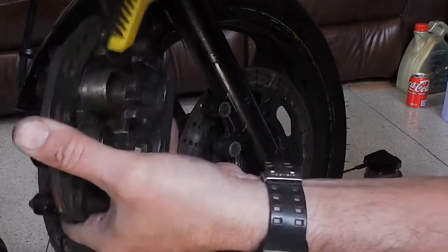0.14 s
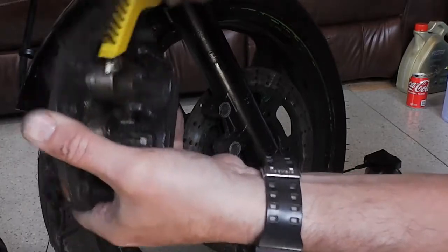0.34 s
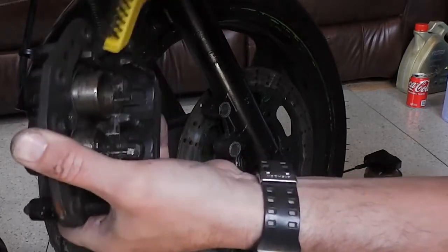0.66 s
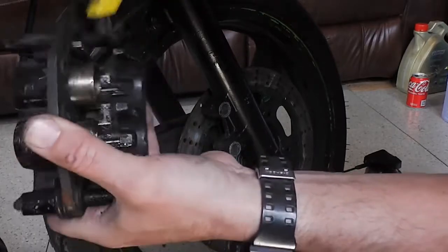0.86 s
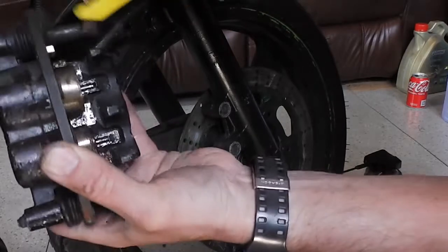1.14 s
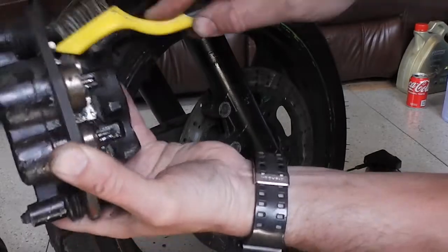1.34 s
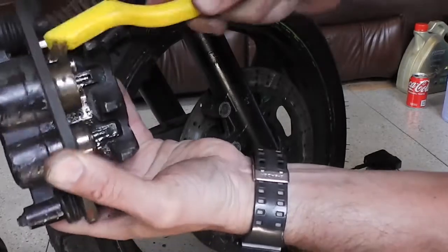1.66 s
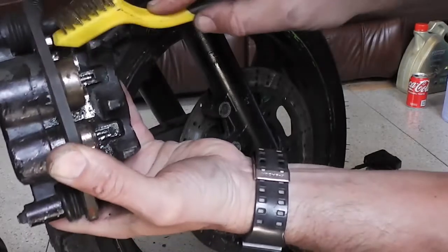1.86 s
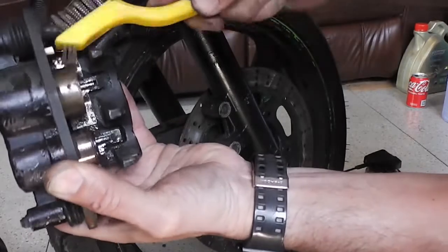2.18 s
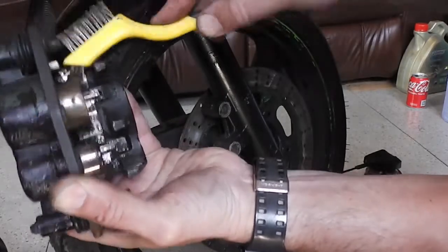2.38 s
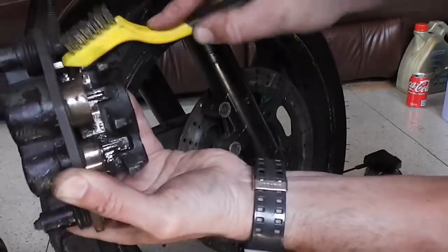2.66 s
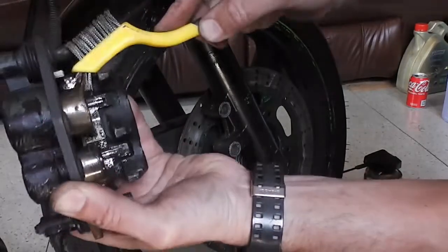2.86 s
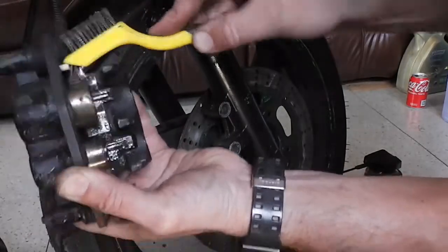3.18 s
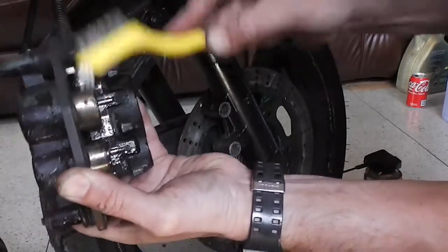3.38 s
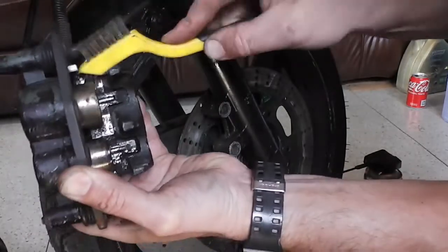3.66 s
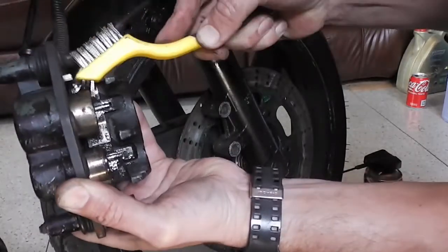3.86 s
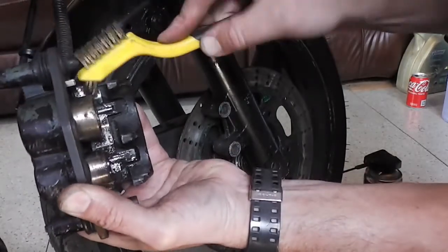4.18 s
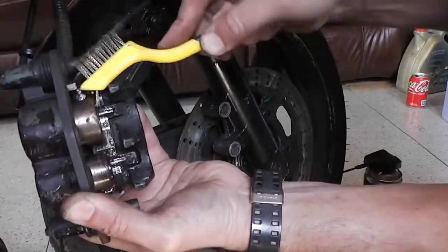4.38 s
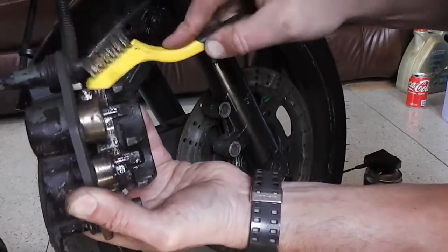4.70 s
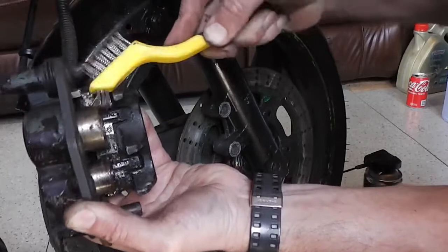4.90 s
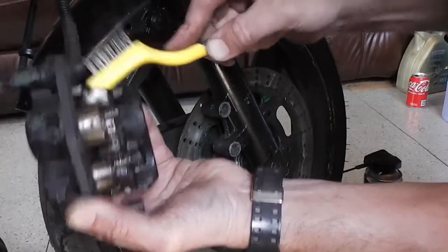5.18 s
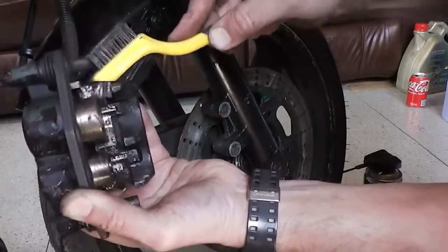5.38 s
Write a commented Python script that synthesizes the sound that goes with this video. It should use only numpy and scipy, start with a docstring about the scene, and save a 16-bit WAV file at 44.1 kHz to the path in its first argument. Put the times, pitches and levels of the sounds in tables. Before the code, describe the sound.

A wire brush works over a hand-held brake caliper. The rasp is high, dry and gritty, each stroke under a tenth of a second, at uneven strength. Snagging bristles give sharp ticks; the brush head raps the casting with short, mid-pitched clacks that barely ring. One early pause holds only soft hand rustle. Quiet room hum lies beneath; the pickup is close, with a small, faint room tail.

```python
"""A small wire brush scrubs the steel pistons of a hand-held brake caliper, close by in a quiet room.
Bristles slip off the metal in clumps: noisy click trains ring the damped modes of four parts.
Tufts snag and let go with scratchy ticks; the brush head knocks the casting, as modal blows.
Shaped noise gives the room hum, a far rumble, the rub of the holding hand, grip hiss and squeaks."""
import sys
import numpy as np
from scipy import signal
from scipy.fft import rfft, irfft, next_fast_len
from scipy.io import wavfile
from scipy.ndimage import uniform_filter1d

SR = 44100
rng = np.random.default_rng(int(sys.argv[2]) if len(sys.argv) > 2 else 0)


def volts_from_db(level):
    """Convert decibel levels to linear amplitude ratios."""
    exponent = np.asarray(level, float) / 20
    return 10 ** exponent


def master_out(mix):
    """Clip the mix to full scale and print it as 16-bit PCM to the path in sys.argv[1]."""
    frames = np.transpose(np.atleast_2d(mix))
    ceiling = np.clip(frames, -1, 1)
    pcm = np.round(ceiling * 32767).astype(np.int16)
    wavfile.write(sys.argv[1], SR, pcm)


N = 244314

# modes of lower casting, upper casting, piston rim, bristle tips:
# (frequency [Hz], relative level [dB], t60 when free [s])
PART_MODES = [
    [(340, 3, 0.063), (453, -44, 0.01), (806, 3, 0.037), (906, 8, 0.091), (1250, 13, 0.014),
     (1490, 6.5, 0.017), (1616, -3, 0.051), (1880, 4.5, 0.0094), (2089, 8, 0.063), (2266, 10, 0.031)],
    [(3283, -1, 0.11), (3218, 8.5, 0.0091), (3670, 2.5, 0.027), (3816, -1.5, 0.03), (3950, 4, 0.079),
     (4473, 1, 0.029), (4873, 0.5, 0.039), (5250, 3.5, 0.037), (5000, -10, 0.038), (7200, -38, 0.032)],
    [(7600, 9, 0.013), (7980, 5, 0.037), (8050, 9, 0.024), (10320, 4, 0.015), (9110, 17, 0.039),
     (9302, 21.5, 0.032), (9680, 7, 0.017), (9950, 8.5, 0.03), (10320, -18, 0.013), (10200, -18, 0.0089)],
    [(11500, -5, 0.017), (13800, 5, 0.01), (14500, 36, 0.024)],
]
# dry scrape of each part, too damped to ring:
# (low edge [Hz], high edge [Hz], level re modes when brushed [dB], when knocked [dB])
PART_SCRAPE = [(1004, 1997, -5, -0.5), (2990, 7800, -2.5, -1.5), (7670, 10240, -3, -3.5),
               (10020, 13160, 22, 4.5)]


def evened(x):
    """Scales to rms 1."""
    return x / np.sqrt(np.mean(x ** 2) + 1e-20)


def read(points, hz):
    """Reads a table on a log-frequency axis."""
    f, value = np.transpose(points)
    return np.interp(np.log(hz + 1), np.log(f + 1), value)


def band(x, lo_hz, hi_hz):
    """Band-pass."""
    sos = signal.butter(3, [lo_hz, min(hi_hz, .45 * SR)], "bandpass", fs=SR, output="sos")
    return signal.sosfilt(sos, x)


def add(mix, s, sound):
    """Mixes a sound in at time s."""
    part = mix[round(s * SR):][:len(sound)]
    part += sound[:len(part)]


def ring(modes, spread_db, favoured_hz=None, longest_s=1):
    """Decaying sines: one part's answer to a blow; each spot struck favours other modes."""
    t = np.arange(3000) / SR
    chance = rng.standard_normal((len(modes), 2))
    tone = np.zeros(len(t))
    for (hz, db, t60_s), (level_chance, pitch_chance) in zip(modes, chance):
        off_db = -32 * np.log2(hz / favoured_hz) ** 2 if favoured_hz else 0
        envelope = volts_from_db(db + off_db + spread_db * level_chance - 60 * t / min(t60_s, longest_s))
        tone += envelope * np.sin(2 * np.pi * hz * (1 + 0.0093 * pitch_chance) * t)
    return tone / np.linalg.norm(tone)


def blow(part, favoured_hz, crack_s, by_peak):
    """Faint first touch, noise crack, then modes near the favoured pitch, damped by the hand.
    Loose pads and clips add a blur of modes too dense to tell apart."""
    snap_t60_s, blur_t60_s, held_t60_s = .004, 0.1, .022
    t = np.arange(3000) / SR
    lo_hz, hi_hz, _, dry_db = PART_SCRAPE[part]
    if favoured_hz:
        lo_hz = max(0.597 * favoured_hz, min(lo_hz, 0.63 * favoured_hz))
        hi_hz = min(1.89 * favoured_hz, 1.04 * hi_hz)
    snap = volts_from_db(3.0 - 60 * t / snap_t60_s)
    blur = volts_from_db(-8.5 - 60 * t / blur_t60_s)
    fall = snap + volts_from_db(-60 * t / crack_s) + blur
    crack = band(rng.standard_normal(len(t)) * fall, lo_hz, hi_hz)
    crack = crack / np.linalg.norm(crack)
    # fast first fall, then a quarter rings on
    tone = ring(PART_MODES[part], 2.5, favoured_hz) * (.25 + volts_from_db(-60 * t / held_t60_s))
    x = tone / np.linalg.norm(tone) + volts_from_db(dry_db) * crack
    # first touch: 40 samples of reversed crack; main onset 0.2 ms
    first_touch = volts_from_db(-24) * crack[40:0:-1]
    x = np.r_[first_touch, x[:-40] * np.minimum(t[:-40] / .0002, 1)]
    return x / (abs(x).max() if by_peak else np.sqrt(np.mean(x[:300] ** 2)))


def background():
    """Room hum, a far rumble that swells, and the dull rub of the hand: shaped stereo noise."""
    # hum spectrum, relative: (frequency [Hz], density [dB per Hz])
    hum_spectrum = [(12, -36.5), (20, 7.5), (160, 3), (189, -16), (305, -9), (342, -15), (372, -8),
                    (1080, -0.5), (2310, -16.5), (5520, -18.5), (7950, -19), (15200, -21.5), (16500, -65)]
    # left-right likeness of the noise: (frequency [Hz], correlation [-1..1])
    hum_likeness = [(60, 0.9), (180, 0.69), (550, 0.5), (1650, 0.16), (4970, 0.051), (15000, 0.1)]
    # low swells: (time [s], far rumble rms [dB], hand rubbing the casting rms [dB])
    swell_rows = [(0.0, -70, -68), (0.29, -69, -65), (0.86, -68, -65), (1.29, -68, -61.5), (1.53, -74, -50),
                  (2.27, -73, -61.5), (2.71, -77, -58.5), (3.75, -74, -57), (3.93, -53, -59.5),
                  (4.1, -47, -55), (4.32, -58, -52), (4.61, -56, -59.5), (5.11, -61, -61.5),
                  (5.54, -60, -60)]
    hum_rms_db = -54.5
    frames, hz = N // 512 + 5, np.fft.rfftfreq(2048, 1 / SR)
    a, b, c, d = rng.standard_normal((frames, 1025, 4)).T
    same = np.clip(read(hum_likeness, hz), -1, 1)[:, None]
    left = a + 1j * b
    right = same * left + np.sqrt(1 - same ** 2) * (c + 1j * d)
    z = np.array([left, right]) * volts_from_db(np.array([1., -1.]))[:, None, None]  # left 2 dB over right

    def shaped(gain):
        """Noise of rms 1 with this spectrum."""
        return evened(signal.istft(z * gain[:, None], nperseg=2048, noverlap=1536)[1][:, :N])

    s, rumble_db, rub_db = np.transpose(swell_rows)
    t = np.arange(N) / SR
    rumble = volts_from_db(np.interp(t, s, rumble_db)) * shaped(np.exp(-((hz - 51) / 8) ** 2))
    rub = volts_from_db(np.interp(t, s, rub_db)) * shaped(np.exp(-((hz - 340) / 170) ** 2))
    return volts_from_db(hum_rms_db) * shaped(volts_from_db(read(hum_spectrum, hz))) + rumble + rub


def slips():
    """Click train: bristle tips let go in clumps a few ms long; a few catch hard."""
    slips_per_s = 6000
    clumps = volts_from_db(4.27 * evened(uniform_filter1d(rng.standard_normal(N), 110)))
    size = volts_from_db(3.8 * np.minimum(rng.exponential(1, N), 4)) * rng.choice([-1, 1], N)
    return evened(size * clumps * (rng.random(N) < slips_per_s / SR))


def brush():
    """Slips under each stroke excite all parts; every stroke lands on another spot.
    The second row is the same strokes as radiated by other bristles."""
    # (start [s], length [s], piston rim as it lands [dB], as it lifts [dB],
    #  upper casting re rim at mid-stroke [dB])
    stroke_rows = [(0.067, 0.1, -47.5, -41.5, -1.5), (0.344, .11, -45, -38.5, -4.5),
                   (0.633, 0.043, -49, -32, -4.5), (1.317, 0.031, -71, -69, 16),
                   (1.379, 0.015, -46, -40, -0.5), (1.498, 0.032, -63, -44, -1.5),
                   (1.546, 0.071, -52, -47, -5), (1.624, 0.066, -37, -38.5, -2.5),
                   (1.424, .075, -65, -66, 1.5), (1.72, 0.085, -67, -65, 1), (1.848, 0.034, -45, -53, -5.5),
                   (1.89, 0.062, -48, -51.5, 2.5), (1.958, 0.073, -53, -56, -2),
                   (2.014, 0.012, -47, -41.5, 0), (2.038, .045, -57, -55, -2),
                   (2.102, 0.064, -41, -47.5, -1.5), (2.174, 0.074, -38, -37, -9.5),
                   (2.285, 0.056, -39.5, -41, -11), (2.358, .04, -70, -68, 5),
                   (2.415, 0.021, -34, -44.5, -3.5), (2.444, 0.038, -49, -48, -3),
                   (2.502, 0.08, -47, -42, -5), (2.613, 0.079, -46.5, -44, -8), (2.717, 0.058, -57, -53, 6),
                   (2.794, 0.018, -40, -42.5, 0), (2.831, 0.051, -40.5, -55, -1),
                   (2.883, 0.073, -52, -59.5, -6), (2.96, 0.053, -41.5, -35.5, -7.5),
                   (3.036, 0.076, -43, -37.5, -6), (3.133, 0.063, -63, -47.5, 1),
                   (3.188, 0.04, -38.5, -34, -12), (3.237, 0.018, -52, -58, 0),
                   (3.262, 0.059, -49.5, -35.5, -4), (3.662, 0.055, -49, -43, 4.5),
                   (3.737, 0.084, -53, -53.5, -2), (3.842, 0.046, -46.5, -44.5, -1),
                   (3.947, 0.036, -68, -59, 2.5), (3.987, 0.084, -41.5, -37.5, -3),
                   (4.1, 0.069, -61, -66, 2.5), (4.175, 0.051, -47, -42.5, -9.5),
                   (4.264, 0.018, -48.5, -63, 6.5), (4.29, 0.055, -63, -65, 1), (4.345, 0.032, -45, -49, 0),
                   (4.396, 0.059, -48.5, -42, -0.5), (4.463, 0.091, -44, -36, -3.5),
                   (4.578, .06, -70, -60, -4), (4.645, 0.061, -47, -37, -10.5),
                   (4.736, 0.019, -38.5, -54, 0), (4.781, 0.036, -49, -48.5, 0),
                   (4.83, 0.061, -47.5, -46, -1), (4.905, 0.051, -38, -37, -7.5),
                   (5.004, 0.045, -50.5, -43.5, -5.5), (5.076, 0.056, -44, -42.5, -7.5),
                   (5.146, 0.026, -50, -61, 1), (5.179, 0.047, -44, -40.5, -10.5),
                   (5.242, 0.046, -37.5, -40, -4.5), (5.338, 0.059, -46.5, -47, -6.5),
                   (5.41, 0.051, -62, -68, -4), (5.484, .022, -43, -66, -5.5), (5.516, 0.036, -63, -52, 1)]
    land_s, lift_s = 0.0058, 0.025  # contact builds before the start, fades after the end
    lower_db, lower_share = -6.5, 0.69  # lower casting follows the upper one
    tips_db, tips_share = -6.5, 0.74  # so do the bristle tips
    # change re rim from landing to lifting, as the brush speeds up
    upper_gain_db, lower_gain_db, tips_gain_db = 3, -1, 9
    brushed_t60_s = .022  # longest ring under the bristles
    spots_hz = (None, 3540, None, None)  # low modes of the upper casting wake most
    clicks = [band(np.arange(3000) == 0, lo_hz, hi_hz) for lo_hz, hi_hz, *_ in PART_SCRAPE]
    clicks = [click / np.linalg.norm(click) for click in clicks]
    out = np.zeros((2, N))
    for row in out:
        shared = slips()
        trains = [evened(1.27 * shared + slips()) for _ in PART_SCRAPE]
        for s, length, land_db, lift_db, upper_db in stroke_rows:
            first = round((s - land_s) * SR)
            at = np.arange(first, min(round((s + length + lift_s) * SR), N))
            t = at / SR - s
            along = np.clip(t / length, 0, 1)
            edges = np.clip(np.minimum(1 + t / land_s, 1 + (length - t) / lift_s), 0, 1) ** 2
            contact = edges * volts_from_db(land_db + (lift_db - land_db) * along)
            levels_db = (lower_db + lower_share * upper_db + lower_gain_db * (along - .5),
                         upper_db + upper_gain_db * (along - .5),
                         0,
                         tips_db + tips_share * upper_db + tips_gain_db * (along - .5))
            for db, spot_hz, modes, click, (_, _, dry_db, _), train in zip(
                    levels_db, spots_hz, PART_MODES, clicks, PART_SCRAPE, trains):
                answer = ring(modes, 3.6, spot_hz, brushed_t60_s) + volts_from_db(dry_db) * click
                answer = answer / np.linalg.norm(answer)
                add(row, at[0] / SR, signal.oaconvolve(train[at] * contact * volts_from_db(db), answer))
    return out


def snags():
    """A tuft of bristles snags and lets go: short scratchy ticks on the rim."""
    # (time [s], piston rim peak [dB], upper casting rms re peak [dB], bristle tips rms re peak [dB])
    snag_rows = [(0.068, -26.5, -12, -24), (0.16, -41.5, -3, -4), (1.532, -47, -7, -25),
                 (1.8388, -42, -14, -16), (1.858, -23.5, -16.5, -29), (1.911, -42, -0.5, -8),
                 (1.993, -30.5, -17, -6.5), (2.101, -33, -17, -17), (2.118, -23, -20, -21),
                 (2.2935, -26, -40, -36), (2.314, -35, -36, -29), (2.343, -25.5, -20, -27),
                 (2.418, -28, -12.5, -32), (2.7246, -37, -6, -9), (2.7358, -28, -20, -24),
                 (2.754, -30.5, -10, -27), (2.797, -39, -8, -3), (3.002, -27, -22, -27),
                 (3.018, -24, -29, -29), (3.273, -46, -19, -24), (3.672, -35, 5, -9),
                 (3.928, -35, -13, -20), (3.9903, -44, -6, -21), (4.1934, -31, -31, -25),
                 (4.2135, -31, -25, -25), (4.368, -36.5, -7.5, -6), (4.441, -31.5, -13, -12),
                 (4.886, -42, -24, -18), (4.9155, -34, -6, -8), (5.042, -30, -18.5, -24),
                 (5.1137, -34, -27, -16), (5.183, -40, -32, -21), (5.201, -24.5, -41, -27),
                 (5.2617, -35, -15, -11), (5.2712, -20.5, -21, -19), (5.3495, -37.5, -12, -10),
                 (5.483, -50, -28, -4)]
    out = np.zeros(N)
    for s, peak_db, upper_db, tips_db in snag_rows:
        upper = volts_from_db(upper_db) * blow(1, None, 0.11, False)
        tips = volts_from_db(tips_db) * blow(3, None, 0.023, False)
        add(out, s, volts_from_db(peak_db) * (blow(2, None, 0.02, True) + upper + tips))
    return out


def handling():
    """Band-passed noise: short fuzzy squeaks of the casting, soft hiss of the grip shifting."""
    # grip hiss: (time [s], rms level [dB])
    rustle_rows = [(0.859, -68), (0.918, -68), (0.928, -55.5), (0.96, -69), (1.02, -63.5), (1.106, -57.5),
                   (1.182, -61), (1.232, -56.5), (1.298, -66)]
    # (start [s], end [s], rms before the Hann fade [dB], centre [Hz], width [Hz])
    squeak_rows = [(0.091, 0.109, -44, 1050, 450), (0.125, 0.151, -42, 866, 120),
                   (0.15, 0.196, -48, 1210, 140), (1.307, 1.364, -42, 1250, 160),
                   (5.115, 5.179, -37, 1380, 428)]
    out, noise = np.zeros(N), rng.standard_normal((1 + len(squeak_rows), SR))
    s, db = np.transpose(rustle_rows)
    t = np.arange(s[0], s[-1], 1 / SR)
    rustle = evened(band(noise[0, :len(t)], 1500, 11500))
    add(out, s[0], volts_from_db(np.interp(t, s, db)) * rustle)
    for (start, end, db, hz, width_hz), hiss in zip(squeak_rows, noise[1:]):
        length = round((end - start) * SR)
        fuzz = band(hiss, hz - width_hz / 2, hz + width_hz / 2)[-length:]
        add(out, start, volts_from_db(db) * evened(fuzz) * np.hanning(length))
    return out


def knocks():
    """Brush head blows on metal, one jolt of the casting in the palm, one hollow bump of the hand."""
    # (time [s], lower casting peak [dB], pitch it favours [Hz],
    #  upper casting rms re peak [dB], piston rim rms re peak [dB])
    knock_rows = [(.094, -27.5, 1250, -16, -5.5), (.192, -14.5, 1340, -12, -48),
                  (.627, -24.5, 2060, -1.5, -6), (.693, -17.5, 1680, -2, -30),
                  (1.304, -19.5, 1370, -15, -31), (1.371, -14.5, 1500, -24.5, -40),
                  (1.395, -19.5, 1430, -23, -27), (1.627, -27.5, 1480, -11.5, -18),
                  (1.691, -26, 360, -20, -25), (1.894, -18, 1020, -29, -21.5),
                  (1.959, -24.5, 840, -20, -20), (2.028, -30.5, 930, -10, 0), (2.453, -19, 1270, -33, -37),
                  (2.706, -31.5, 705, -25, -22), (2.773, -14, 1380, -31, -23),
                  (2.819, -17.5, 1410, -22, -32), (3.078, -27, 1320, -12.5, -19),
                  (3.188, -19.5, 1490, -21, -33), (3.323, -15, 1020, -14.5, -13),
                  (3.41, -12, 2260, -12, -19.5), (3.42, -25.5, 1670, -10, -19),
                  (3.599, -17, 2150, -4.5, -18), (3.644, -16.5, 1030, -18, -43),
                  (4.134, -27.5, 1220, -47, -39), (4.267, -34.5, 1250, -16, -26),
                  (4.357, -24.5, 1330, -29, -21), (4.422, -16.5, 1330, -40, -21),
                  (4.743, -23.5, 1780, -26, -22)]
    # hollow bump: peak [dB], frequency [Hz], t60 [s]
    bump_db, bump_hz, bump_t60_s = (-44.5, 210, 0.17)
    bump_s = 1.266
    thump_s, thump_hz, thump_peak_db = .693, 400, -22
    # the more a knock wakes the upper casting, the higher it rings there
    dull_hz, bright_hz, dull_db = 2970, 5040, -15.5
    shake_db = -22  # bristle tips shake with rim and upper casting
    out, t = np.zeros(N), np.arange(3000) / SR
    for s, peak_db, lower_hz, upper_db, rim_db in knock_rows:
        upper_hz = dull_hz + (bright_hz - dull_hz) * np.clip(1 - upper_db / dull_db, 0, 1)
        lower = blow(0, lower_hz, 0.014, True)
        upper = volts_from_db(upper_db) * blow(1, upper_hz, 0.016, False)
        rim = volts_from_db(rim_db) * blow(2, None, 0.015, False)
        tips = volts_from_db(shake_db) * (volts_from_db(rim_db) + volts_from_db(upper_db)) * blow(3, None, 0.009, False)
        add(out, s, volts_from_db(peak_db) * (lower + upper + rim + tips))
    push = 2 * np.pi * thump_hz * t
    add(out, thump_s, volts_from_db(thump_peak_db) * push * np.exp(1 - push))
    add(out, bump_s, volts_from_db(bump_db - 60 * t / bump_t60_s) * np.sin(2 * np.pi * bump_hz * t))
    return out


def room(x):
    """Sparse taps of random sign, each band dying at its own speed, other taps for each channel."""
    # (frequency [Hz], t60 [s])
    decay_rows = [(250, 0.07), (1700, 0.31), (5500, 0.34), (8500, 0.21), (13000, 0.2)]
    taps = np.zeros((2, SR // 2))
    # one tap in every 20 samples
    at = np.arange(100, SR // 2 - 20, 20) + rng.integers(0, 20, (2, (SR // 2 - 101) // 20))
    np.put_along_axis(taps, at, rng.choice([-1., 1.], at.shape), 1)
    hz, t, z = signal.stft(taps, SR, nperseg=256)
    decay = volts_from_db(-60 * t / read(decay_rows, hz)[:, None])
    tail = signal.istft(z * decay, SR, nperseg=256)[1]
    return signal.fftconvolve(x[None], tail / np.linalg.norm(tail[0]), axes=1)[:, :N]


def ports(x, other):
    """Two microphone ports hear the caliper with level and phase differences that vary with pitch."""
    # (frequency [Hz], left over right [dB])
    lean_rows = [(300, 8), (770, 4.5), (1170, 2.5), (1790, 2), (2740, -1.5), (4190, 3), (6410, 0.5),
                 (9200, 9), (12000, -0.3), (15000, -1)]
    # (frequency [Hz], left ahead of right [rad])
    lead_rows = [(1000, 0), (4300, 0), (5250, 1.3), (5860, 1.3), (7060, 1), (7750, .5), (9390, -1.5),
                 (10200, -1.7), (14700, .7)]
    # brushing at both ports: (frequency [Hz], left-right likeness [0..1])
    likeness_rows = [(2000, 1), (4500, 1), (9000, 0.99), (14000, 0.25)]
    size = next_fast_len(N + 4096)
    hz = np.fft.rfftfreq(size, 1 / SR)
    half = volts_from_db(read(lean_rows, hz) / 2) * np.exp(.5j * read(lead_rows, hz))
    same = np.clip(read(likeness_rows, hz), 0, 1)
    left = rfft(x, size)
    right = same * left + np.sqrt(1 - same ** 2) * rfft(other, size)
    return irfft(np.array([left * half, right / half]), size)[:, :N]


def scene():
    """Brush, snags, knocks and handling, their room tail and the background."""
    strokes, ticks, blows = brush(), snags(), knocks() + handling()
    tail = room(volts_from_db(-12.5) * (strokes[0] + ticks) + volts_from_db(-12) * blows)
    direct = ports(strokes[0] + ticks + blows, strokes[1] + ticks + blows)
    return direct + tail + background()


def low_pass(x):
    """Removes everything above the highest recorded frequency."""
    return signal.sosfilt(signal.butter(12, 17010, fs=SR, output="sos"), x)


def record(dry):
    """The microphone rolls off the deepest bass."""
    cut = signal.sosfilt(signal.butter(2, 40, "highpass", fs=SR, output="sos"), dry)
    return low_pass(cut)


dry = scene()
out = record(dry)
master_out(out)
```